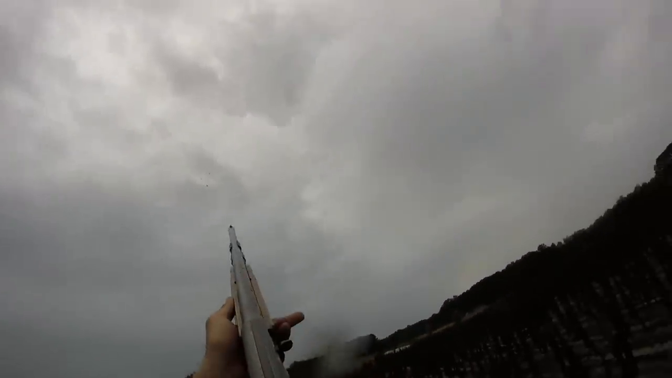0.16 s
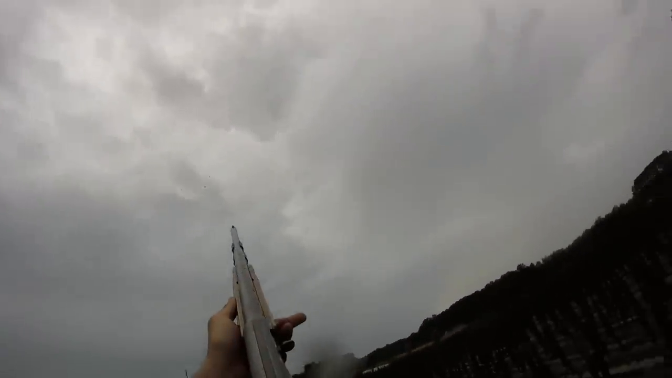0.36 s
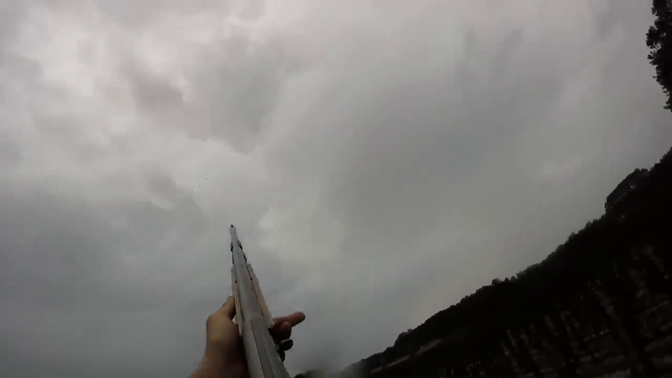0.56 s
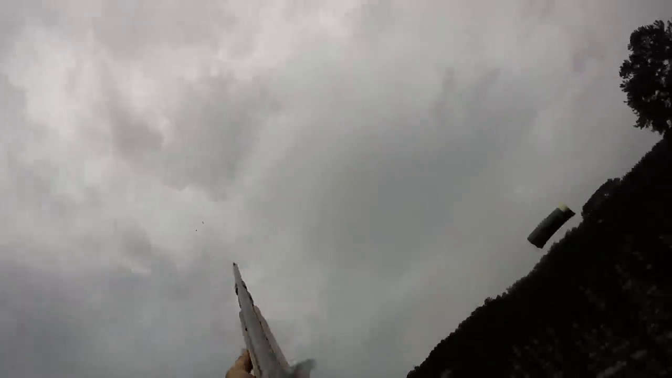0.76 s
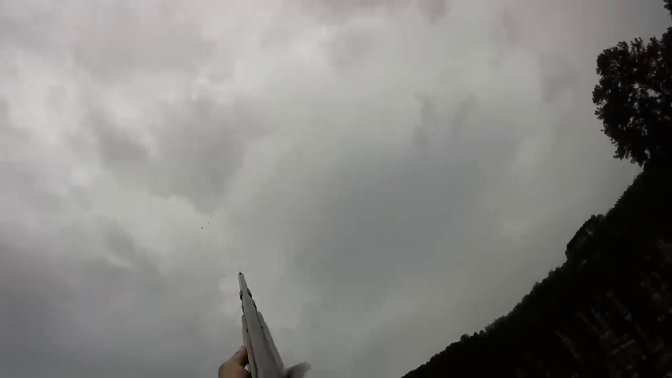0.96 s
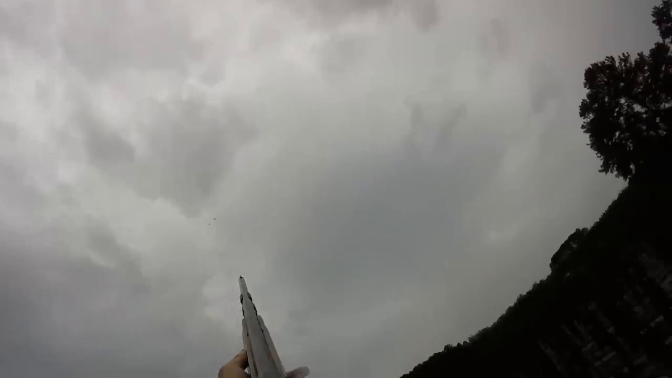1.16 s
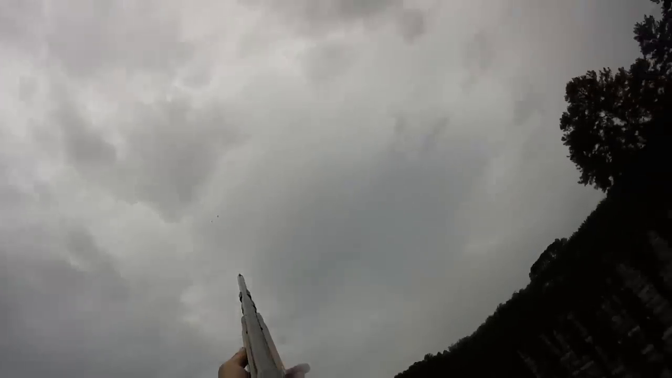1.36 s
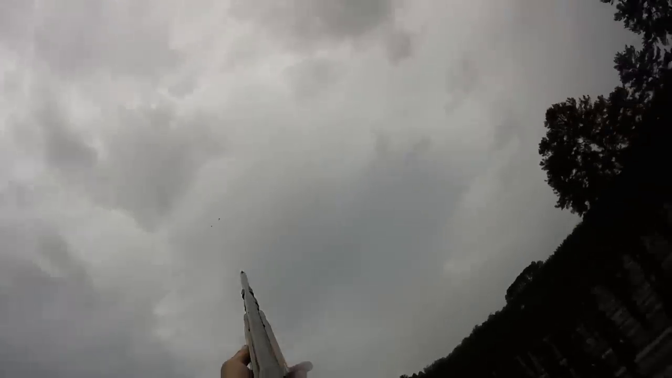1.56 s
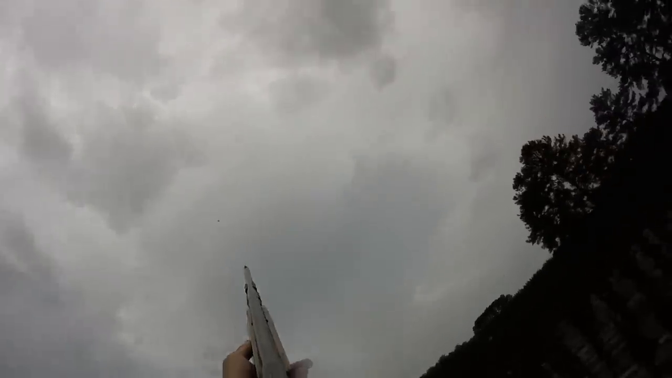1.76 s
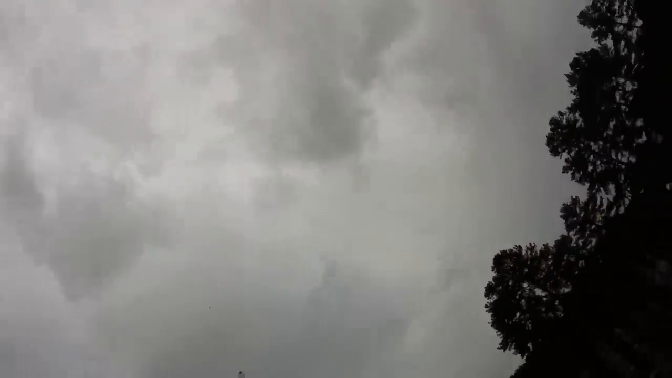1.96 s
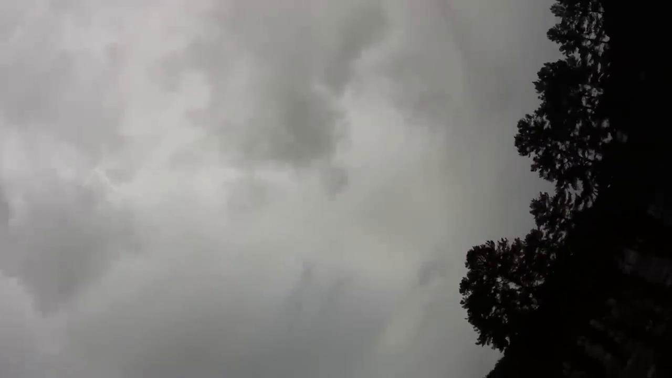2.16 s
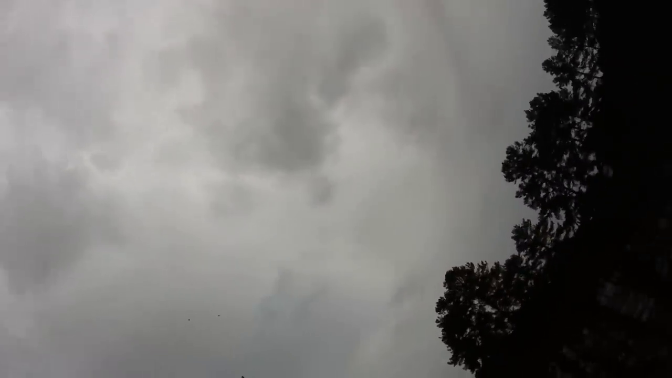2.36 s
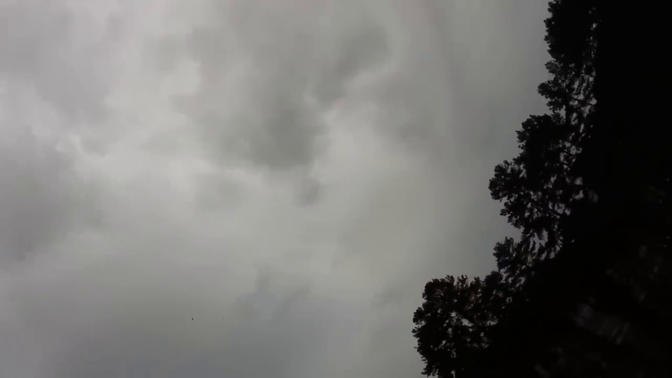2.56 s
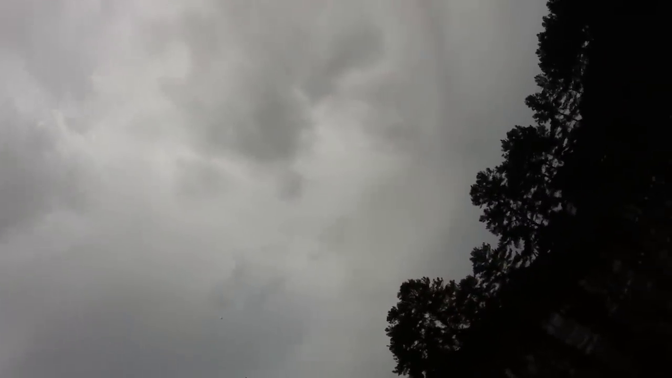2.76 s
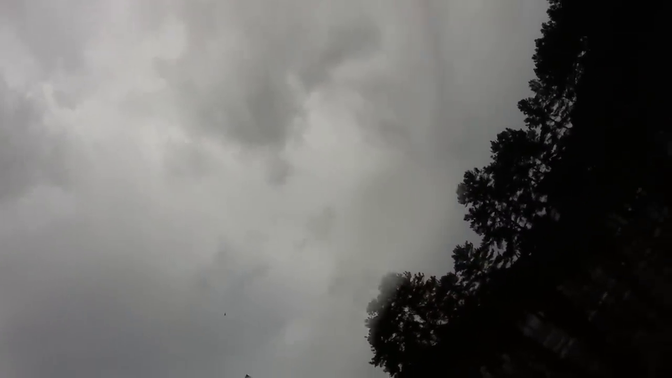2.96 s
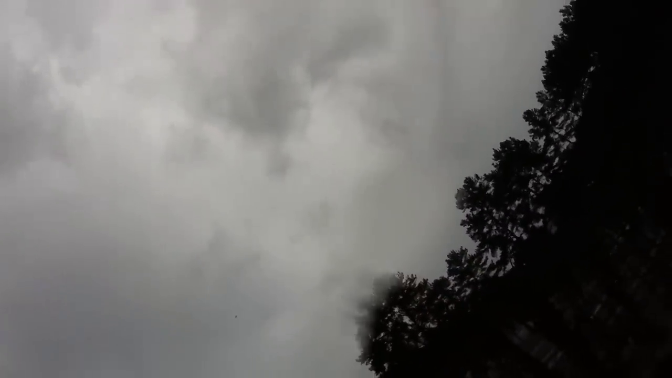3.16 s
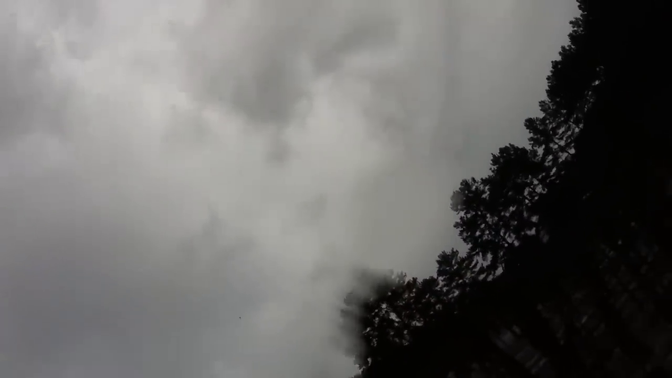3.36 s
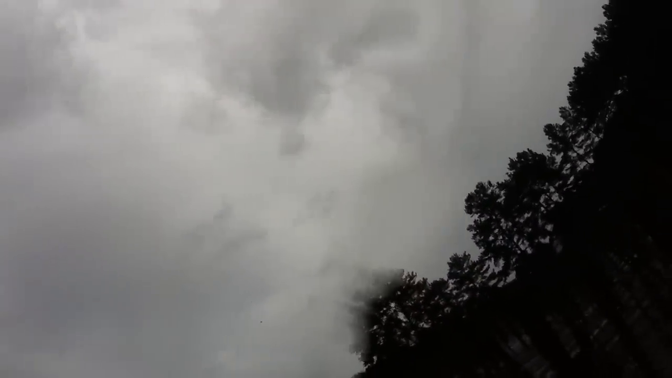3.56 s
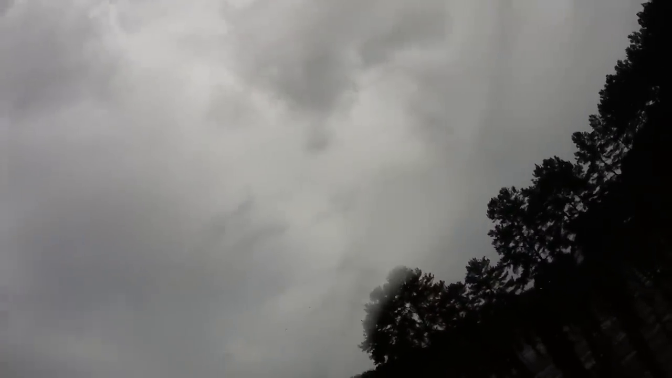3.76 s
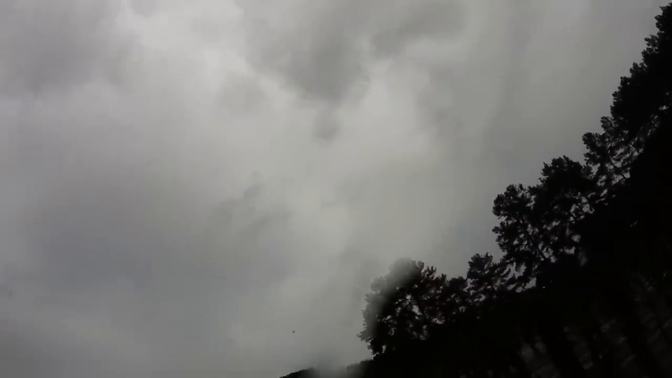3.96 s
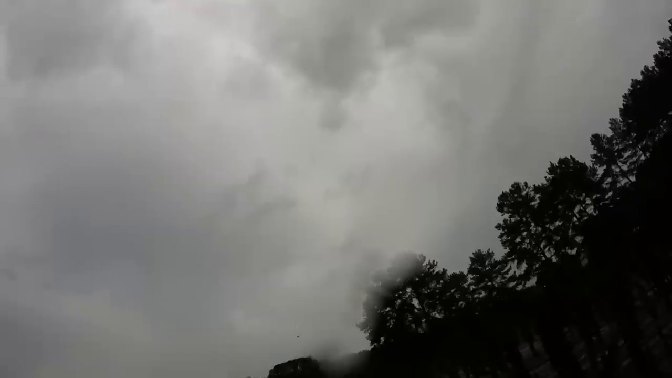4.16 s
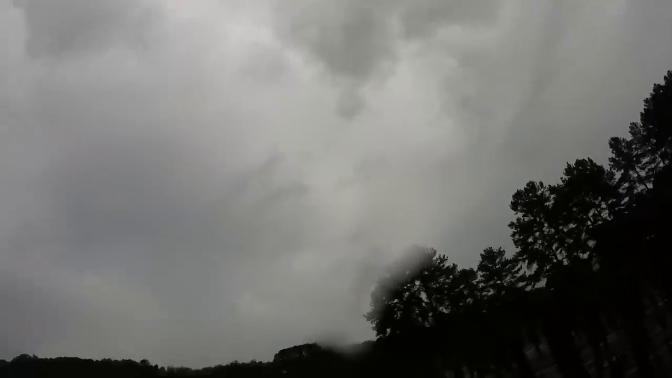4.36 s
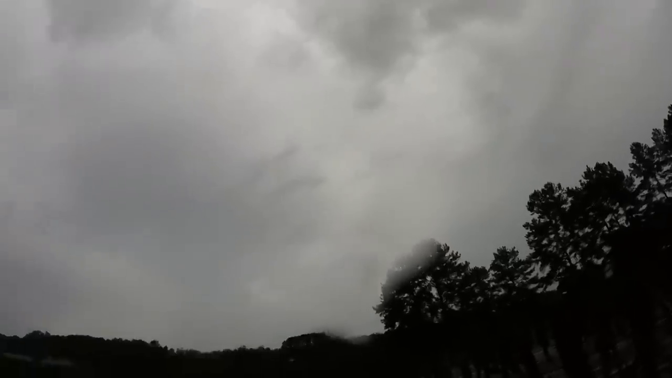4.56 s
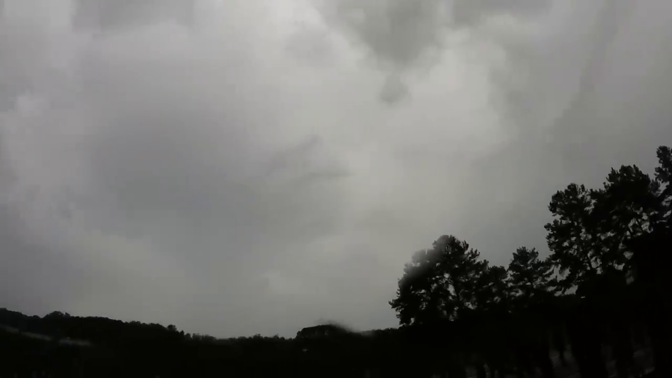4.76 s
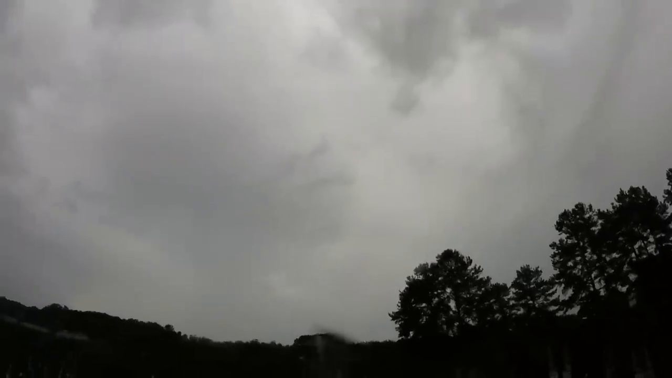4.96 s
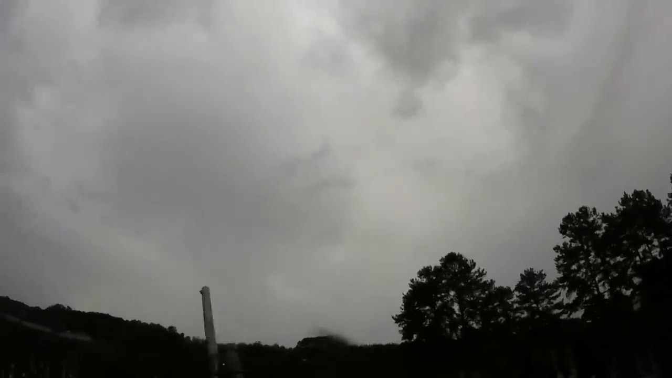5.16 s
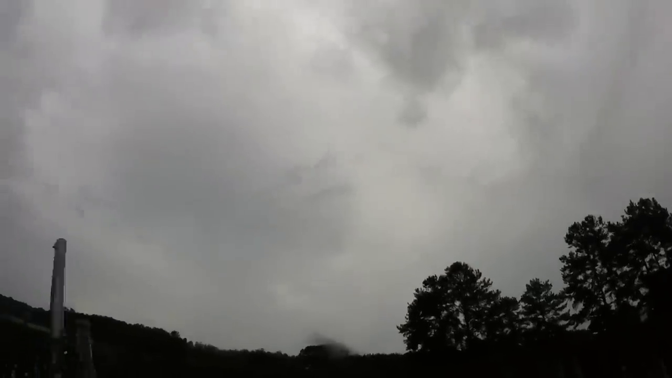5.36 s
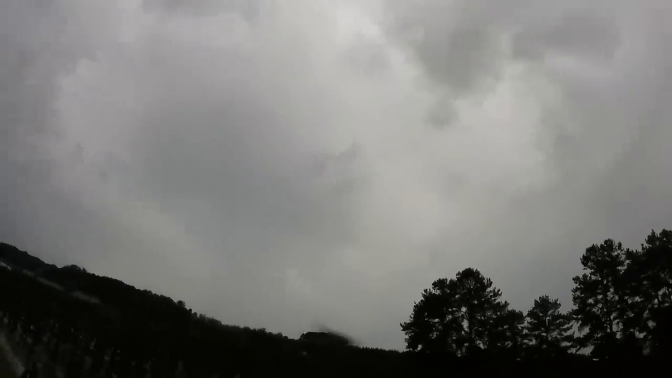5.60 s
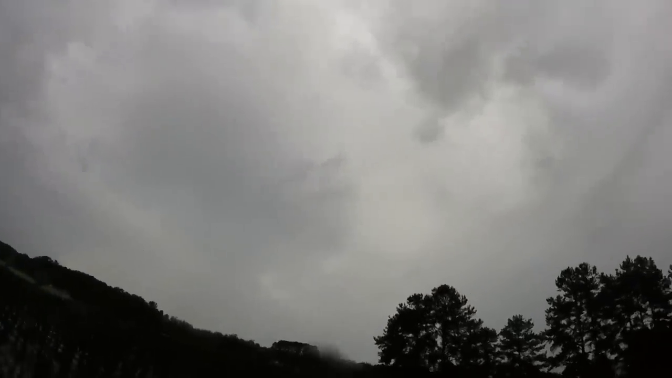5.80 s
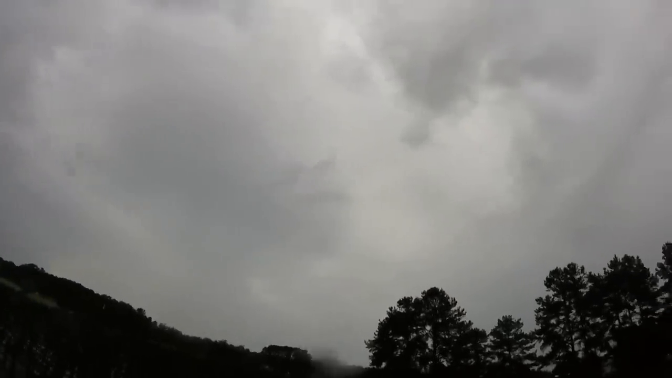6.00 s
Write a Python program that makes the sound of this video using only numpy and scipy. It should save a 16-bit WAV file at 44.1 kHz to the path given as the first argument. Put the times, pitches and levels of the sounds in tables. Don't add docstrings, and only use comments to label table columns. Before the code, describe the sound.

Outdoors in an open field, a small head-worn microphone hears low wind, faint hiss, a distant engine drone and bird chirps. A safety catch snaps, then a self-loading shotgun fires very close, distorting, its bolt clacking shut. A second later another gun cracks from behind and the shooter fires again almost together. Echoes bounce off a barn and trees and roll away as small knocks on the stock continue, ending with another safety click.

```python
import sys
import numpy as np
from scipy import signal
from scipy.fft import rfft, irfft
from scipy.io import wavfile
from scipy.ndimage import uniform_filter1d

SR = 44100
rng = np.random.default_rng(int(sys.argv[2]) if len(sys.argv) > 2 else 0)


def wrap_up_sound(samples):
    columns = np.atleast_2d(samples).T
    tamed = np.clip(columns, -1, 1)
    steps = np.round(tamed * 32767).astype(np.int16)
    wavfile.write(sys.argv[1], SR, steps)


def amplitude_ratio(level_db):
    exponent = np.asarray(level_db, float) / 20
    return 10 ** exponent


N = 266099
TIME = np.arange(N) / SR


def add(out, x, s):
    i = int(round(s * SR))
    out[i:i + len(x)] += x[:len(out) - i]


def band(x, lo_hz, hi_hz, order=2):
    return signal.sosfilt(signal.butter(order, [lo_hz, hi_hz], "band", fs=SR, output="sos"), x)


def coloured(x, spectrum, lo_hz, hi_hz):
    hz = np.maximum(np.arange(N // 2 + 1) * SR / N, 1)
    f, db = np.transpose(spectrum)
    bins = rfft(x) * amplitude_ratio(np.interp(np.log(hz), np.log(f), db, left=-60, right=-60))
    inside = (hz > lo_hz) & (hz < hi_hz)
    return irfft(bins, N) * N / np.sqrt(2 * np.sum(np.abs(bins[inside]) ** 2))


def walk(rate):
    hold = int(SR / rate)
    steps = np.repeat(rng.standard_normal(N // hold + 1), hold)
    return 0.4 * uniform_filter1d(steps, hold)[:N]


# f/Hz, level/dB [dB per Hz]
HISS = [(71, -42.5), (120, -11), (163, -11.5), (257, -24), (315, -23.5), (404, -21), (675, -19.5),
        (900, -27), (998, -24.5), (3960, -36.5), (6350, -41), (14500, -56), (16400, -69.5)]


def hiss():
    return coloured(rng.standard_normal(N), HISS, 10500, 14500) * amplitude_ratio(-81.5)


# t/s, level/dB [strength]
SHOTS = [
    (0.818, -2.42),
    (1.852, -10.5),
    (1.925, -3.03),
]
# f/Hz, level/dB [dB per Hz]
WIND = [(12, -37), (20, -4.5), (113, -5), (162, -11), (230, -6.5), (255, -12), (400, -16), (520, -36.5),
        (880, -120)]


def wind():
    settle_db, settle_db_s = -34, 520
    settle = np.zeros(N)
    for s, db in SHOTS[::2]:
        settle += (TIME > s) * amplitude_ratio(settle_db + db - settle_db_s * np.maximum(TIME - s, 0))
    gusts = amplitude_ratio(-53.5 + 2 * walk(5.6))
    return coloured(rng.standard_normal(N), WIND, 25, 110) * (gusts + settle)


def engine():
    hz = 106.6 + 5.7 * TIME
    drone = np.sqrt(2) * np.sin(2 * np.pi * np.cumsum(hz) / SR)
    return drone * amplitude_ratio(-50 - walk(18)) * (TIME < SHOTS[0][0])


# t/s, level/dB
CHIRPS = [(.077, -59.5), (.158, -54.5), (2.555, -66), (2.67, -63.5), (2.857, -60.5), (2.942, -64),
          (3.445, -62.5), (4.409, -60), (4.496, -60), (4.639, -58.5), (5.740, -57.5), (5.860, -58.5),
          (5.955, -57.5)]


def bird():
    chirp_s = .031
    out, u = np.zeros(N), np.linspace(0, 1, int(chirp_s * SR))
    upper_hz = 5500 + 2800 * np.sin(u * np.pi / 2)
    lower_hz = 5600 + 1900 * u
    upper = np.sin(2 * np.pi * np.cumsum(upper_hz) / SR) * np.sin(np.pi * u ** 0.36)
    lower = np.sin(2 * np.pi * np.cumsum(lower_hz) / SR) * np.sin(np.pi * u) ** 3
    for s, db in CHIRPS:
        add(out, amplitude_ratio(db) * (upper + 0.83 * lower), s)
    leaves = amplitude_ratio(-48) * rng.standard_normal(SR // 10) * np.exp(-TIME[:SR // 10] / 0.016)
    return out + signal.fftconvolve(out, leaves)[:N]


# near level/dB, near fade [dB/s], far level/dB, far fade [dB/s]
ROLL = [
    (-30, 17.5, -48.5, 3),
    (-42, 12, -55.5, 3.1),
    (-42, 19.5, -70, 1.4),
    (-55, 29, -86, 0.4),
]
# delay t/s, depth t/s, boom, mid, treble level/dB
TREE_LINES = [
    (.11, 0.12, -28, -48.5, -50),
    (.278, .014, -23, -37, -44),
    (.33, 0.066, -38.5, -48, -53),
    (0.399, 0.085, -35, -44, -45),
    (.535, 0.084, -45.5, -49.5, -49),
    (.885, .17, -49, -54, -55),
    (1.5, 0.31, -59, -59, -68),
    (2.1, 0.29, -52, -58, -78),
]


def echo_levels():
    step = 32
    roll_rise_s, rumble_late_s = .05, .3
    top_db, top_loss_db_s = -10, 8.5
    t = TIME[::step]
    power, late = np.zeros((4, len(t))), np.ones(len(t))
    for s, shot_db in SHOTS:
        age = np.maximum(t - s, 0)
        rise = 1 - np.exp(-age / roll_rise_s)
        late = np.where(t > s, 1 - np.exp(-(age / rumble_late_s) ** 2), late)
        for layer, (near_db, near_fade, far_db, far_fade) in enumerate(ROLL):
            near = amplitude_ratio(shot_db + near_db - near_fade * age) ** 2
            far = amplitude_ratio(shot_db + far_db - far_fade * age) ** 2
            power[layer] += rise * (near + far)
        for delay, depth, boom_db, mid_db, treble_db in TREE_LINES:
            answer = np.exp(-((age - delay) / depth * 2 - 1) ** 4) * (t > s)
            air_db = treble_db + top_db - top_loss_db_s * delay
            power += amplitude_ratio(shot_db + np.array([[boom_db], [mid_db], [treble_db], [air_db]])) ** 2 * answer
    rumble = np.sqrt(power[0]) * late * amplitude_ratio(-6.5)
    return np.array([np.interp(TIME, t, v) for v in [*np.sqrt(power), rumble]])


# f/Hz, level/dB [dB per Hz]
BOOM = [(59, -37.5), (110, -21), (190, -7.5), (247, 1.5), (509, 0), (606, -2), (1000, -15.5), (1300, -49.5),
        (2200, -120)]
# f/Hz, level/dB [dB per Hz]
HOUSING = [(470, -36), (800, -2), (943, -3), (1310, 3), (1430, 1), (1920, 5), (2890, -12), (3480, -6.5),
           (4010, -17), (4430, -9.5), (5820, -16), (6790, -13), (7660, -30.5), (8550, -29), (11000, -54.5),
           (14300, -71.5), (22000, -120)]
# f/Hz, level/dB [dB per Hz]
RUMBLE = [(55, -21), (90, -5), (140, -1), (190, 0), (260, -22)]


def trees():
    clicks = rng.standard_normal((4, N)) * amplitude_ratio(1.7 * rng.exponential(size=(4, N)))
    housing = np.array(HOUSING)
    low_dip, high_dip = np.searchsorted(housing[:, 0], [2800, 7500])
    boom = coloured(clicks[0], BOOM, 200, 950) * amplitude_ratio(4.5 * walk(28))
    mid = coloured(clicks[1], housing[:low_dip + 1], 1600, 2400) * amplitude_ratio(3.6 * walk(25))
    treble = coloured(clicks[2], housing[low_dip:high_dip + 1], 3300, 7300) * amplitude_ratio(2.1 * walk(22))
    top = coloured(clicks[3], housing[high_dip:], 7600, 10000)
    rumble = coloured(rng.standard_normal(N), RUMBLE, 90, 200) * amplitude_ratio(5 * walk(6.3))
    return np.sum(echo_levels() * [boom, mid, treble, top, rumble], axis=0)


def duck():
    drop_db, hold_s, recover_s = -8, 0.57, 0.6
    down = [(TIME > s) * np.clip(1 - (TIME - s - hold_s) / recover_s, 0, 1) for s, _ in SHOTS]
    return amplitude_ratio(drop_db * np.max(down, axis=0))


def barn():
    delay_s, level_db, wave_ms = .277, -27, 3.6
    out, ms = np.zeros(N), 1000 * TIME[:SR // 10]
    for s, db in SHOTS[::2]:
        add(out, amplitude_ratio(db + level_db) * (1 - 2 * ms / wave_ms) * (ms < wave_ms), s + delay_s)
    return band(out, 49, 480)


# t/s, level/dB, t60 at 4 kHz [s], tilt [dB per octave]
WASH = [
    (.456, -70, 0.023, 4),
    (0.821, -35, 0.43, 0),
    (.966, -39, 0.19, 1),
    (1.854, -44, 0.79, -3.5),
    (1.927, -32.5, 0.19, 3),
    (2.05, -41, 0.22, 0.5),
    (5.577, -38.5, 0.085, 0),
]
# f/Hz, level/dB
WASH_BANDS = [(600, 1), (1200, -8), (2200, -2), (3500, -5), (5500, -3.5), (8500, -7.5), (11500, -20),
              (14000, -18.5)]


def wash():
    out, t = np.zeros(N), TIME[:SR // 2]
    for hz, band_db in WASH_BANDS:
        swell = np.zeros(N)
        for s, db, t60, tilt_db in WASH:
            start_db = db + band_db + tilt_db * np.log2(hz / 4000)
            add(swell, amplitude_ratio(start_db - 60 * t / t60 * (hz / 4000) ** 0.045), s)
        noise = band(rng.standard_normal(N), hz / 1.3, hz * 1.064)
        out += swell * amplitude_ratio(9.0 * walk(150)) * noise / noise.std()
    return out


# t/s, low mode level/dB, high mode f/Hz, its
# level/dB, tick level/dB
KNOCKS = [(0.083, -48, 1650, -52.5, -51), (0.585, -49, 1720, -43.5, -44.5), (0.689, -58, 1745, -65, -66),
          (2.26, -45, 2110, -60, -54), (3.13, -57, 1590, -38.5, -52), (3.239, -31, 2270, -41, -52.5),
          (3.557, -35.5, 1944, -35.5, -44), (3.873, -62, 1980, -50, -55), (4.778, -65, 2044, -42, -49.5),
          (4.949, -57, 1990, -47, -47), (5.068, -46.5, 1520, -68, -63), (5.33, -49.5, 2240, -55, -54),
          (5.436, -44.5, 1890, -50.5, -57), (5.577, -30, 3080, -29, -60), (5.812, -47, 2140, -60, -61)]


def knocks():
    out, t = np.zeros(N), TIME[:SR // 20]
    rise = 1 - np.exp(-t / 0.00019)
    for s, low_db, high_hz, high_db, tick_db in KNOCKS:
        low = amplitude_ratio(low_db + 5.5 - 60 * t / 0.023) * np.sin(2 * np.pi * 892 * t)
        flutter = 1 + .5 * np.cos(2 * np.pi * 480 * t)
        high = amplitude_ratio(high_db + 13.5 - 60 * t / 0.012) * np.sin(2 * np.pi * high_hz * t) * flutter
        tick = amplitude_ratio(tick_db + 20.5 - 60 * t / 0.007) * band(rng.standard_normal(len(t)), 2500, 4560)
        add(out, rise * (low + high + tick), s)
    return out


# t/s, level/dB, f/Hz
BOLT_THUMPS = [
    (0.821, -21, 62),
    (0.957, -38, 105),
    (1.925, -21, 66),
    (2.062, -40, 95),
]


def jolts():
    out, t = np.zeros(N), TIME[:SR // 10]
    for s, db, hz in BOLT_THUMPS:
        add(out, amplitude_ratio(db - 60 * t / 0.053) * np.sin(2 * np.pi * hz * t), s)
    return out


def clacks(events, modes, spread_oct):
    out, t = np.zeros(N), np.arange(SR // 10) / SR
    hz, mode_db = np.transpose(modes)
    tones = np.sin(2 * np.pi * np.outer(hz, t))
    for s, db, bright_hz, rattle_ms, ring_ms in events:
        rattle = rng.standard_normal(len(t)) * np.exp(-(1000 * t / rattle_ms) ** 2)
        rattle *= np.minimum(t / 0.0006, 1)
        off_centre = np.log2(hz / bright_hz) / spread_oct
        gain = amplitude_ratio(mode_db + 2 * rng.standard_normal(len(hz)) - 2 * off_centre ** 2)
        gain[::2] *= -1
        decay = np.exp(-np.log(1000) * np.outer(np.sqrt(hz / bright_hz), 1000 * t / ring_ms))
        x = signal.fftconvolve(rattle, gain @ (decay * tones))[:len(t)]
        add(out, amplitude_ratio(db) * x / np.abs(x).max(), s)
    return out


# t/s, peak level/dB, brightness f/Hz, rattle [ms], ring t60 [ms]
SAFETY = [
    (.4539, -11.5, 7400, .25, 4),
    (.4547, -12.5, 2020, 0.1, 5.7),
    (.4552, -15.5, 2050, 0.27, 22),
    (5.5748, -17, 2960, 1, 6.1),
    (5.5758, -9.5, 5080, .35, 2.13),
    (5.5763, -25, 1196, 0.38, 6),
    (5.5782, -19, 2940, 0.18, 14),
]
# f/Hz, level/dB
CATCH = [(1200, -3.5), (1650, 5), (2051, 1.5), (2500, 3.5), (3085, 4.5), (3600, -2), (4414, 3.5), (5270, 0),
         (6500, 1.5), (8300, -0.5), (9800, -7), (11600, -10), (13800, -7)]


def safety():
    return clacks(SAFETY, CATCH, spread_oct=1.6)


# t/s, peak level/dB, brightness
# f/Hz, rattle [ms], ring t60 [ms]
ACTION = [(.8135, -21, 3956, 1.5, 4.3), (.8148, 0.5, 5230, 3.3, 6), (.8165, -1.5, 1690, 6.4, 6),
          (.8180, 5, 893, 2.9, 6), (.8325, -11.5, 4440, 2.2, 6), (.8385, -23, 5815, 1.5, 6),
          (.9543, -11.5, 4200, 8.2, 8), (.9610, -3.5, 3500, 3.1, 3.3), (.9640, -19, 1250, 5.9, 8),
          (1.8498, -4, 1496, 1.5, 5), (1.8530, -25, 586, 7, 15), (1.903, -30.5, 4935, 2.7, 10),
          (1.9185, -17, 3993, 1.5, 5), (1.9201, 3.5, 4478, 3, 6), (1.9225, 5.5, 3456, 3.7, 10),
          (1.9372, -15.5, 4715, 3.1, 6), (1.957, -30, 4930, 2.5, 6), (2.0422, -4.5, 4630, 1.34, 6),
          (2.0438, -15.5, 4640, 8, 8), (2.0485, -20, 1710, 6.6, 9.2), (2.0520, -12, 900, 2.2, 10)]
# f/Hz, level/dB
STEEL = [(480, -21.5), (820, -15), (1250, 0), (1650, 1), (2050, 3.5), (2500, -1), (3000, -0.5), (3400, 4),
         (4300, 1), (4900, 5), (5600, 4.5), (6700, 0.5), (8500, -2), (10500, -8.5), (13500, -4.5)]


def action():
    return clacks(ACTION, STEEL, spread_oct=0.94)


def blasts(waves):
    out, ms = np.zeros(N), np.arange(SR // 50) * 1000 / SR
    for s, db, first, second, recover in waves:
        ramp = 1 - (np.minimum(ms, first + second) / first) ** 1.2
        recovery = np.exp(-np.maximum(ms - first - second, 0) / recover)
        add(out, amplitude_ratio(db) * ramp * recovery, s)
    return band(out, 35, 3900, order=1)


# t/s, peak level/dB, first lobe [ms], second lobe [ms], recovery [ms]
NEIGHBOUR = [
    (1.8507, 14, 0.81, 0.79, 0.11),
]


def neighbour_blast():
    return -uniform_filter1d(blasts(NEIGHBOUR), size=9)


# t/s, peak level/dB, first lobe [ms], second lobe [ms], recovery [ms]
BLASTS = [
    (.8197, 9, 0.49, 0.25, 0.52),
    (0.8264, -5.5, 1.04, 0.12, 0.28),
    (.8299, -12.5, 0.66, 0.18, .6),
    (1.859, -24.5, 1.01, 0.78, 0.42),
    (1.9235, 3, 0.91, 0.71, 0.57),
    (1.9307, -4, 0.57, 0.2, .8),
    (1.932, -4.5, .6, 0.23, .6),
]


def own_blasts():
    return blasts(BLASTS)


def scene():
    far = duck() * (trees() + wind() + hiss() + engine())
    steel = band(action() + safety(), 420, 12000)
    pressure = own_blasts() + neighbour_blast() + barn() + jolts()
    return (far + bird() + wash() + knocks() + steel + pressure)[None]


# t/s, level/dB
HUSH = [
    (1.826, 0.5),
    (1.834, -16.5),
    (1.849, -22),
    (1.851, -0.5),
]


def overload(dry):
    t, db = np.transpose(HUSH)
    return np.clip(dry * amplitude_ratio(np.interp(TIME, t, db)), -.97, .97)


def roll_off(x):
    return signal.sosfilt(signal.butter(12, 16510, fs=SR, output="sos"), x)


def record(dry):
    x = overload(dry)
    x = signal.sosfilt(signal.cheby2(8, 55, 16900, fs=SR, output="sos"), x)
    return roll_off(x)


dry = scene()
out = record(dry)
wrap_up_sound(out)
```